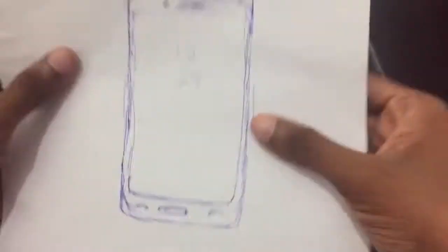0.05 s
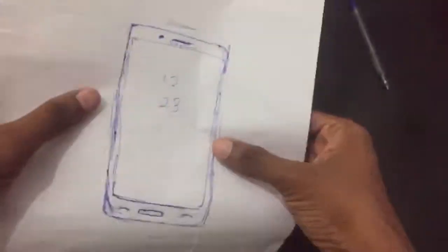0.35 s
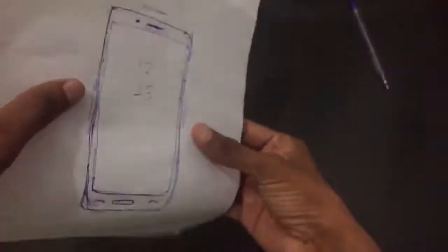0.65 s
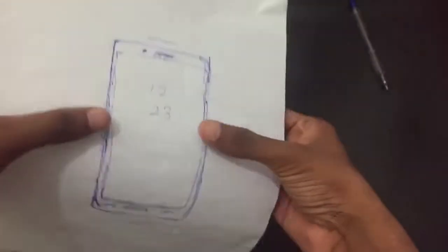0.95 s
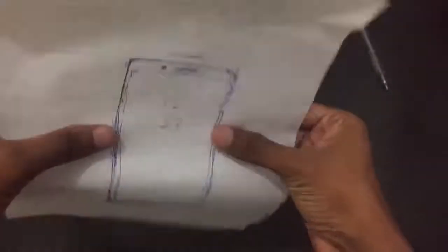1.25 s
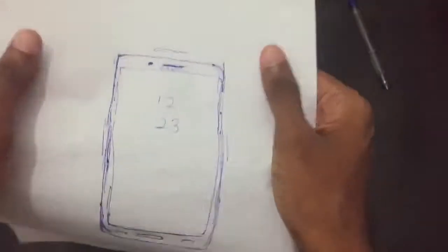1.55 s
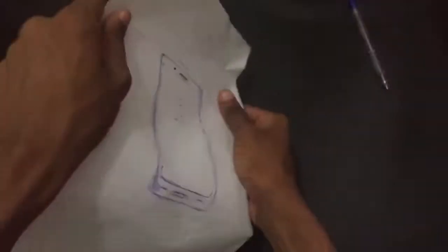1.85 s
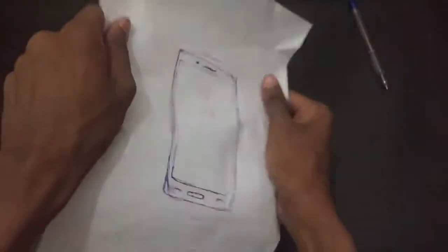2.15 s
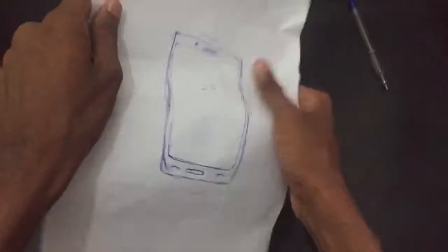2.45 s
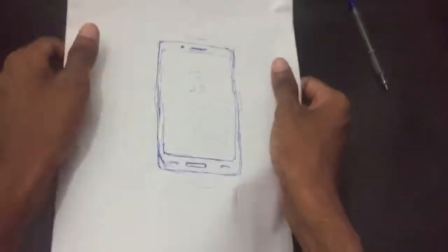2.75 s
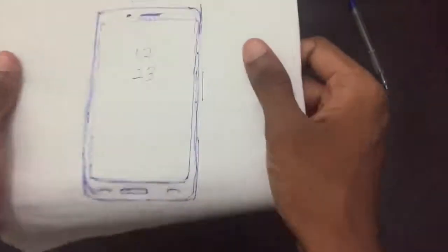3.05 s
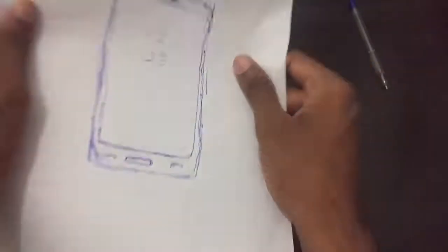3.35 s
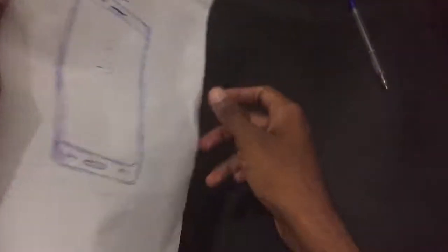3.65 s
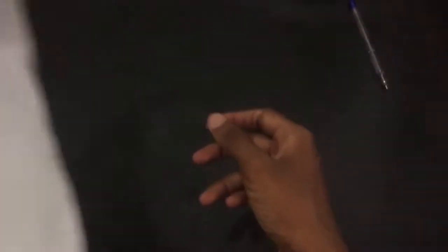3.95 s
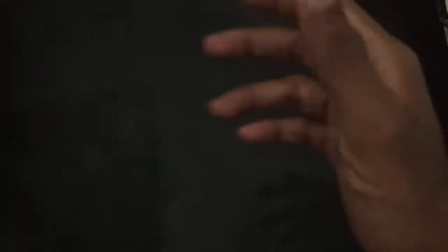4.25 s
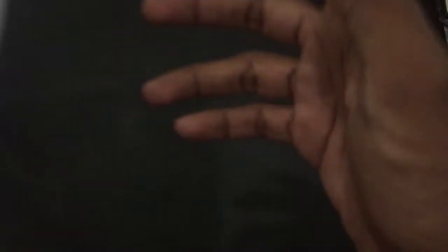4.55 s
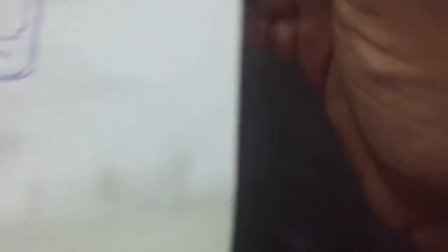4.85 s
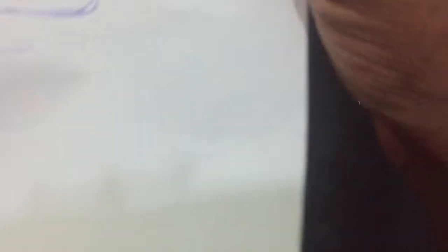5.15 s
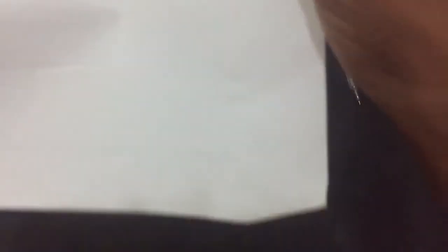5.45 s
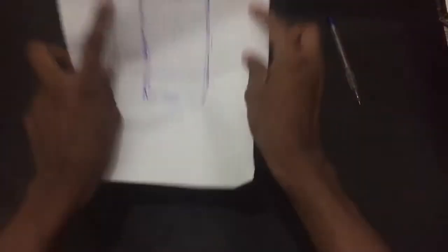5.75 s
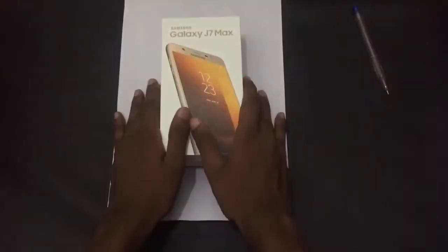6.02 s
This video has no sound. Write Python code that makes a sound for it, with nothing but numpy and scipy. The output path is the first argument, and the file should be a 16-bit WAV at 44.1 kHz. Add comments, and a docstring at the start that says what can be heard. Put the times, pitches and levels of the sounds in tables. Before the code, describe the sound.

Close by in a small, quiet room, hands wave and bend a sheet of paper, which crackles and flutters over the soft hiss of sliding fingers. The rustling thins out and fingers knock lightly on a hollow cardboard box. The sheet then scrapes and slaps onto a table, the box lands with a thump, and a faint, thin, high whine follows.

```python
"""Paper and a cardboard box

Two hands wave and bend a sheet of paper over a table in a small room. Creases snap over a fine
rustle and the hiss of sliding fingers. Fingers knock on a hollow cardboard box, the sheet scrapes
and slaps onto the table, the box lands with a thump, and a thin, high whine follows."""
import sys
import numpy as np
from scipy import signal
from scipy.fft import rfft, irfft
from scipy.io import wavfile

SR = 44100
rng = np.random.default_rng(int(sys.argv[2]) if len(sys.argv) > 2 else 0)


def put_to_file(sound):
    """Save the sound as 16-bit audio at rate SR, in the file named by the first command-line argument."""
    columns = np.atleast_2d(sound).T  # one column per channel
    safe = np.clip(columns, -1, 1)
    whole_steps = np.round(safe * 32767)
    wavfile.write(sys.argv[1], SR, whole_steps.astype(np.int16))


N = 276948
TIME = np.arange(N) / SR
LET_GO_S = 4.48  # the sheet is put aside here

# Each move of the hands bends the sheet: start_s, length_s, flutter_db, crackle_db
BENDS = [(0, 0.013, -62.5, -57), (.17, 0.056, -47.5, -44), (.29, 0.018, -58, -55), (.44, 0.13, -57.5, -67),
         (.53, 0.035, -51.5, -52), (.62, 0.046, -51, -50.5), (.78, 0.027, -49, -58),
         (.88, 0.085, -57.5, -58.5), (1.11, 0.21, -50, -47), (1.36, 0.039, -51.5, -42),
         (1.43, 0.19, -50, -48.5), (1.71, .17, -49.5, -46), (1.93, 0.034, -46, -34),
         (2.01, 0.016, -47, -43.5), (2.14, 0.18, -48, -40), (2.34, 0.073, -52, -46.5),
         (2.55, 0.073, -46.5, -47), (2.71, 0.05, -58.5, -51.5), (3.01, 0.037, -64, -60.5),
         (3.2, 0.15, -54.5, -54.5), (3.53, 0.022, -60, -43), (4.0, 0.13, -57.5, -68),
         (4.28, 0.078, -70, -58), (4.35, 0.03, -46.5, -57), (4.63, 0.029, -77.5, -62.5),
         (4.87, 0.067, -58.5, -72.5), (5.292, 0.21, -53.5, -59.5), (5.54, 0.17, -56.5, -48.5),
         (5.75, 0.092, -58, -50), (5.87, .1, -41, -44)]
# The curved sheet rings like a hollow: pitch_hz, width_hz, level_db
SHEET_HOLLOWS = [(165, 15, -11), (302, 45, -7), (476, 24, -9)]
# Fingers stroke along the paper: start_s, length_s, level_db
STROKES = [(0, .055, -56.5), (0.29, 0.049, -54.5), (0.401, 0.041, -59.5), (0.494, 0.097, -57),
           (0.938, 0.034, -60.5), (1.148, 0.19, -51.5), (1.417, 0.072, -47), (1.466, .13, -52.5),
           (1.666, 0.093, -52), (1.73, 0.25, -58), (1.94, .11, -62), (2.153, 0.16, -59), (2.4, 0.088, -52),
           (2.513, .15, -50), (2.722, 0.082, -51), (2.992, 0.08, -55), (3.071, 0.04, -57.5),
           (3.151, 0.054, -54.5), (3.191, 0.084, -58), (3.51, 0.13, -62)]
# The held sheet whispers, louder when it is near: time_s, level_db
WHISPER_LEVELS = [(0, -68.5), (1.1, -70), (1.3, -62), (2.9, -69.5), (3.4, -70.5), (4.2, -78.5), (4.3, -100)]
# Wide swings push puffs of air: start_s, length_s, level_db
AIR_PUFFS = [(2.19, .04, -55), (2.59, 0.03, -46.5), (4.06, 0.056, -56), (4.88, 0.037, -52),
             (5.29, 0.05, -38.5), (5.39, 0.29, -52), (5.92, 0.063, -33.5), (6.06, .2, -48)]
# The loudest snaps and slaps of the sheet: time_s, level_db, build_up_s, centre_hz, treble_db
SHEET_SNAPS = [(0.0185, -47, 0.0019, 1060, -10), (0.1738, -37.5, 0.00047, 1450, -3),
               (0.2, -36.5, 0.012, 1260, -1), (0.2403, -36.5, 0.00052, 1140, -3),
               (0.2691, -39, 0.0019, 1380, -31), (0.329, -36.5, .0034, 1400, -3),
               (0.492, -50.5, 0.0024, 1000, -16), (0.5598, -40, 0.0035, 1500, -21),
               (0.6076, -44, .0005, 1550, -8), (0.6221, -37.5, 0.00024, 1520, -13),
               (0.6594, -31.5, 0.0034, 1580, -5), (0.7232, -40.5, 0.0011, 1330, -36),
               (0.7974, -28.5, .0015, 1760, -2), (0.8196, -38.5, 0.0012, 1510, -11),
               (0.898, -42.5, 0.0035, 1420, -38), (1.0312, -46.5, 0.00087, 1800, -47),
               (1.1156, -30, 0.0001, 1610, 26.5), (1.124, -33.5, 0.0025, 1690, 4),
               (1.1582, -40.5, 0.0016, 1320, -18), (1.19, -25.5, 0.0023, 1620, 16.5),
               (1.2933, -33, 0.0057, 1320, -2), (1.312, -35, 0.0043, 1420, 3),
               (1.371, -33.5, 0.004, 1400, -4), (1.4355, -29, 0.00065, 1530, -20),
               (1.5359, -42.5, .001, 1580, 4), (1.725, -36, 0.015, 1470, -6),
               (1.7813, -34, 0.00027, 1480, -2), (1.7866, -32.5, 0.001, 2100, -8),
               (1.8624, -22, 0.0053, 1690, 1.5), (1.92, -37, 0.0048, 1410, -3),
               (1.9408, -32, .0016, 2020, 3), (1.955, -27, 0.0083, 2020, 10), (2, -45.5, .0008, 2200, 71),
               (2.018, -35, 0.0022, 1680, 3), (2.0381, -29.5, 0.0098, 1600, -3),
               (2.1069, -33, 0.011, 1180, -9), (2.1458, -36.5, 0.00028, 1670, 10.5),
               (2.1538, -36.5, 0.00094, 2000, 17), (2.159, -32, 0.0061, 1320, 0),
               (2.1753, -27, 0.0013, 1780, 8), (2.2022, -21, 0.0052, 1650, 2.5),
               (2.2119, -35, 0.0075, 1320, -2), (2.259, -24, 0.0049, 1890, 7.5),
               (2.2975, -29, .0035, 1860, -4), (2.3059, -25.5, 0.0046, 1480, -3),
               (2.357, -37.5, 0.0056, 1750, 1), (2.405, -31.5, 0.0072, 1520, -5),
               (2.5295, -34, 0.013, 2300, 20), (2.5612, -30.5, 0.0007, 1510, 2),
               (2.5819, -32, 0.0013, 1880, 11), (2.598, -26, 0.0069, 1700, 9),
               (2.641, -42, 0.00072, 1480, -30), (2.66, -41.5, 0.00077, 1370, -31),
               (2.7241, -42.5, 0.0062, 1180, -2), (2.7763, -39, 0.00064, 1980, 1),
               (3.011, -44.5, .0007, 2720, 14), (3.0723, -49.5, 0.0024, 1330, 5),
               (3.084, -47, 0.00043, 1880, 57), (3.2216, -44, 0.0013, 1740, 2),
               (3.2863, -36, 0.0041, 1750, -5), (3.3629, -36.5, .0003, 2120, 13),
               (3.378, -36.5, 0.00087, 1380, -4), (3.541, -32.5, 0.0033, 1260, -36),
               (4.36, -34, 0.0012, 1470, -59), (4.912, -49.5, 0.0019, 1080, -25.5),
               (5.2612, -51, 0.00047, 1590, 5), (5.2928, -39.5, 0.00031, 667, 13),
               (5.307, -51.5, .0006, 1200, -6), (5.331, -49.5, .001, 1280, -14),
               (5.583, -36, 0.0022, 1020, 16), (5.628, -29.5, 0.005, 1740, 12), (5.64, -35, 0.007, 1080, 5),
               (5.8581, -22.5, .0012, 1550, 2), (5.8697, -22.5, 0.00062, 1590, 17),
               (5.8762, -15, 0.002, 1190, -1), (5.882, -21.5, 0.0035, 1210, 18.5),
               (5.891, -27, .0045, 1200, 20), (5.9259, -30.5, 0.0013, 1000, 19),
               (5.931, -19, 0.0019, 1300, -7)]
# How long the room's echo takes to fade by 60 dB: pitch_hz, fade_s
ROOM_FADES = [(100, 0.27), (500, 0.79), (1500, 0.28), (4000, 0.4), (12000, 0.41)]
# A dry finger rubs on paper or card: start_s, length_s, level_db, pitch_hz
FINGER_RUBS = [(0.433, 0.08, -60.5, 990), (0.978, 0.037, -58, 1180), (2.926, .03, -56.5, 1870),
               (4.646, 0.027, -63.5, 1330), (4.78, 0.11, -63, 1322)]
# The box is touched, picked up and set down: time_s, level_db
BOX_KNOCKS = [(3.5405, -36), (3.9107, -49.5), (4.0144, -42), (4.056, -51), (4.087, -54), (4.1179, -40.5),
              (4.135, -46.5), (4.362, -43.5), (4.80, -54.5), (5.083, -60.5), (5.9282, -31), (5.94, -31),
              (5.958, -43)]
# The hollow box's own notes, each fading by 60 dB: pitch_hz, level_db, fade_s
BOX_NOTES = [(436, 2.5, 0.035), (577, -3, 0.038), (655, -1, 0.064), (800, -5, 0.02), (1166, 3, 0.02),
             (1380, -0.5, 0.026), (1780, -15, 0.012), (2250, -14.5, 0.031)]
# Blows on the table, where a longer contact sounds duller: time_s, level_db, contact_s
TABLE_BLOWS = [(5.292, -39.5, 0.0046), (5.58, -44, 0.0011), (5.921, -32, 0.0013), (5.9389, -20.5, 0.0031)]
# The notes of the table with the box on it, each fading by 60 dB: pitch_hz, level_db, fade_s
TABLE_NOTES = [(102.7, 4, 0.29), (83.3, -7, 0.57), (58.5, -19.5, 0.92), (165, -19, 0.23), (234, -11, 0.36),
               (276, -5.5, 0.31), (360, -10, 0.37)]
# The sheet and the box scrape over the table: start_s, length_s, level_db
TABLE_SCRAPES = [(5.478, 0.057, -49), (5.57, 0.11, -47.5), (5.67, 0.088, -54.5), (5.8, .06, -46),
                 (5.92, 0.013, -48)]
# Air hisses out as the sheet is slapped flat: start_s, length_s, level_db
SLAP_HISS = [(5.868, 0.016, -25.5)]
# The two tones of the whine: time_s, upper_hz, lower_hz, level_db
WHINE_TONES = [(5.95, 5000, 4850, -66), (5.98, 5050, 4970, -47), (6.04, 5070, 4680, -46.5),
               (6.08, 5020, 4620, -48), (6.13, 5010, 4730, -49), (6.155, 5080, 4220, -47.5),
               (6.19, 5040, 4490, -50.5), (6.28, 5160, 4960, -49.5)]
# The sound is a little dull at first, then very dull for a while: time_s, treble_lost_share
TREBLE_LOSS = [(3.44, .33), (3.46, .65), (4.2, .7), (4.26, 1), (5.472, 1), (5.485, 0)]
# The level dips briefly: time_s, half_width_s, depth_db
LEVEL_DIPS = [(4.24, 0.012, 25), (5.913, 0.0044, 26.5)]

# A "tone" table says how strong the low and high parts of a sound are, compared with each other.
# Crackling paper fibres: pitch_hz, gain_db
CRACKLE_TONE = [(150, -26.5), (500, -4), (800, 4), (1200, 4.5), (1800, 1), (2800, -4.5), (4200, -14.5),
                (6000, -24), (10000, -43), (16000, -55.5)]
# The whole sheet fluttering: pitch_hz, gain_db
FLUTTER_TONE = [(40, -21.5), (90, 3.5), (150, 1), (330, 0.5), (500, -3.5), (800, -16), (2000, -32),
                (6000, -75.5)]
# Rumbling air: pitch_hz, gain_db
RUMBLE_TONE = [(15, -14), (35, -0.5), (65, 11.5), (110, 1), (170, -20), (500, -49.5)]
# Fingertips sliding on paper: pitch_hz, gain_db
SLIDE_TONE = [(500, -20.5), (1500, 13), (4000, 8.5), (6500, 9.5), (10000, 2), (14000, 2), (16000, -10.5)]
# The faint hiss round the held sheet: pitch_hz, gain_db
WHISPER_TONE = [(500, -11), (1500, 0.5), (4000, -8), (6500, 4.5), (8700, 0), (9200, 5), (9700, -11.5),
                (14000, -6.5), (16000, -11)]
# The quiet room: pitch_hz, gain_db
ROOM_TONE = [(20, 2), (70, -3.5), (160, -0.5), (400, -4.5), (1400, -5.5), (3000, -13.5), (5300, -17),
             (6500, -46), (16000, -54.5)]
# A snapping crease: pitch_hz, gain_db
SNAP_TONE = [(40, -23.5), (130, -4), (200, -10.5), (330, -2), (430, -5), (720, -10), (1050, 1), (1500, 1),
             (2400, -6), (3700, -12.5), (5200, -20.5), (10000, -35), (16000, -51)]
# Rattling cardboard: pitch_hz, gain_db
RATTLE_TONE = [(80, -10), (300, -3.5), (700, 5), (1200, 5.5), (2200, -3.5), (5000, -29.5),
               (15000, -50.5)]
# Paper scraping on the table: pitch_hz, gain_db
SCRAPE_TONE = [(400, 0.5), (1500, 11), (4000, 4.5), (6000, 6), (7800, -3), (9200, -1), (11000, -5.5),
               (15000, -3), (16000, -7)]
# The rasp round the whine: pitch_hz, gain_db
RASP_TONE = [(2500, -56), (3900, -44), (4400, -9), (4900, 4), (5150, 5), (5350, -45), (7800, -37),
             (9300, -10), (10200, -22), (10600, -46), (13500, -46), (15200, -35), (16000, -43)]


def gain_of(db):
    """Turns decibels into a number to multiply by."""
    return 10 ** (np.asarray(db) / 20)


def evened(x):
    """Scales a sound so that its average power is 1."""
    return x / np.sqrt(np.mean(x ** 2) + 1e-20)


def look_up(table, hz):
    """A table's value at any pitch, sliding evenly through the octaves between its rows."""
    pitches, values = np.transpose(table)
    return np.interp(np.log(hz + 1), np.log(pitches + 1), values)


def curve(rows, column=1):
    """Joins one column of a time table with straight lines, giving a value for every sample."""
    rows = np.asarray(rows)
    return np.interp(TIME, rows[:, 0], rows[:, column])


def add(mix, start_s, sound):
    """Adds a sound to the mix at the given time."""
    part = mix[max(round(start_s * SR), 0):][:len(sound)]
    part += sound[:len(part)]


def ring(db_at, size=2048):
    """The short ring of one click whose strength at each pitch is db_at(hz)."""
    hz = abs(np.fft.fftfreq(size, 1 / SR))
    log_gain = np.log(gain_of(np.maximum(db_at(hz), -100)))
    spectrum = np.exp(np.conj(signal.hilbert(log_gain)))  # puts all the ringing after the click
    return np.fft.ifft(spectrum).real


def shaped(x, tone):
    """Gives a sound the lows and highs of a tone table, at power 1."""
    response = ring(lambda hz: look_up(tone, hz), size=8192)
    return evened(signal.oaconvolve(x, response)[:len(x)])


def noise(tone, size=N):
    """Steady noise shaped by a tone table."""
    return shaped(rng.standard_normal(size), tone)


def wander(rate_hz):
    """A smooth random wobble, mostly slower than rate_hz."""
    hz = np.fft.rfftfreq(N, 1 / SR)
    return evened(irfft(rfft(rng.standard_normal(N)) / (1 + (hz / rate_hz) ** 4), N))


def grains(per_s, spread_db):
    """Random clicks, most of similar size and a few that differ more."""
    sizes = gain_of(spread_db * np.minimum(rng.exponential(1, N), 4)) * rng.choice([-1, 1], N)
    return evened(sizes * (rng.random(N) < per_s / SR))


def swells(rows, rise_s, fade_db_per_s, column=2):
    """A loudness curve in which each row rises, holds and dies away; overlaps add in power."""
    power = np.zeros(N)
    for row in rows:
        t = TIME - row[0]
        level_db = row[column] - fade_db_per_s * np.maximum(t - row[1], 0)
        power += (np.clip(t / rise_s, 0, 1) * gain_of(level_db)) ** 2
    return np.sqrt(power)


def resonate(x, hz, width_hz):
    """Makes a sound ring round a pitch that may move; a narrower width rings longer."""
    turn = np.exp(2j * np.pi * np.cumsum(hz) / SR)
    decay = np.exp(-np.pi * width_hz / SR)
    return 2 * (turn * signal.lfilter([1 - decay], [1, -decay], x / turn)).real


def rustle(rise_s=0.0077, fade_db_per_s=192, clump_db=3, drift=0.1):
    """With each bend, fibres crackle, small creases snap, and the sheet flutters and fans the air."""
    held = np.clip(LET_GO_S - TIME, 0, 1) ** 0.5  # a held sheet is never quite still
    bending = np.hypot(swells(BENDS, rise_s, fade_db_per_s, column=3), held * gain_of(-69))
    flapping = np.hypot(swells(BENDS, rise_s, fade_db_per_s), held * gain_of(-68))
    fibres = grains(per_s=1100, spread_db=-0.5) * gain_of(clump_db * wander(rate_hz=38))
    crackle = gain_of(-1) * shaped(fibres, CRACKLE_TONE)
    small_snaps = gain_of(-6) * shaped(grains(per_s=60, spread_db=1), SNAP_TONE)
    buckling = grains(per_s=800, spread_db=3.5)
    pitch_drift = np.exp(drift * wander(rate_hz=4))  # the hollow notes move as the sheet curves
    hollow = sum(gain_of(db) * evened(resonate(buckling, hz * pitch_drift, width_hz))
                 for hz, width_hz, db in SHEET_HOLLOWS)
    flutter = gain_of(-1) * shaped(buckling, FLUTTER_TONE) + hollow
    air = gain_of(-8) * noise(RUMBLE_TONE)
    return (crackle + small_snaps) * bending + (flutter + air) * flapping


def sliding(uneven_db=2.5, taper=0.55):
    """Fingertips drag over the paper's grain and hiss with each stroke, over the sheet's whisper."""
    strokes = np.zeros(N)
    for start_s, length_s, db in STROKES:
        add(strokes, start_s, gain_of(db) * signal.windows.tukey(int(length_s * SR), taper))
    hiss = noise(SLIDE_TONE) * gain_of(uneven_db * wander(rate_hz=430))
    whisper = noise(WHISPER_TONE) * gain_of(curve(WHISPER_LEVELS))
    return hiss * strokes + whisper


def room_air(rumble_db=-80, quiet_db=-71):
    """The room murmurs, and the swinging hands and sheet push low puffs of air through it."""
    puffs = gain_of(-2) * swells(AIR_PUFFS, rise_s=0.0067, fade_db_per_s=148)
    rumble = noise(RUMBLE_TONE) * (puffs + gain_of(rumble_db))
    return rumble + gain_of(quiet_db) * noise(ROOM_TONE)


def room_echo(x, first_s=0.004, echoes_per_s=3000):
    """Sound bounces round the room, and each pitch dies away at its own speed."""
    t = np.arange(SR // 2) / SR
    echoes = rng.standard_normal(len(t)) * (rng.random(len(t)) < echoes_per_s / SR) * (t > first_s)
    hz, delay_s, bands = signal.stft(echoes, SR, nperseg=256)
    fade = gain_of(-60 * delay_s / look_up(ROOM_FADES, hz)[:, None])
    tail = signal.istft(bands * fade, SR, nperseg=256)[1]
    return signal.fftconvolve(x, tail / np.linalg.norm(tail))[:N]


def patch_ring(centre_hz, treble_db, on_table, usual_hz=1600, bass_hz=600, treble_hz=4500):
    """A snapped patch of paper rings briefly; a larger patch rings lower and with more bass."""
    shift = usual_hz / centre_hz
    bass_db = -3 + 12.5 * np.log2(shift) + 4 * on_table  # fuller against the table or box
    # every bend of the sheet has its own hollow notes
    note_hz = np.geomspace(150, 12000, 80)
    notes = np.c_[note_hz, 5 * rng.standard_normal(len(note_hz)) * note_hz / (note_hz + 350)]

    def db_at(hz):
        """The snap's tone, with the pitch shift fading out towards the treble."""
        shifted_hz = hz * shift ** (1 / (1 + (hz / treble_hz) ** 2))
        bass = bass_db / (1 + (hz / bass_hz) ** 4)
        treble = treble_db * (1 - 1 / (1 + (hz / treble_hz) ** 4))
        return look_up(SNAP_TONE, shifted_hz) + look_up(notes, hz) + bass + treble
    return ring(db_at)


def snaps(slips_per_s=9000, burst_share=0.59, settle_s=0.059, size=4096):
    """A crease gives way in a burst of tiny slips round one main click."""
    out, lead = np.zeros(N), size // 4
    t = (np.arange(size) - lead) / SR
    for time_s, db, build_s, centre_hz, treble_db in SHEET_SNAPS:
        fall_s = 0.0022 + build_s  # a snap that builds slowly also dies slowly
        slips = rng.choice([-1, 1], size) * (rng.random(size) < slips_per_s / SR)
        swell = np.exp(-np.where(t < 0, (t / build_s) ** 2, t / fall_s))
        settling = gain_of(-24) * np.exp(-abs(t) / settle_s) * (t > 0)
        patch = patch_ring(centre_hz, treble_db, on_table=time_s > LET_GO_S)
        burst = evened(signal.fftconvolve(slips * (swell + settling), patch)[:size])
        click = evened(signal.fftconvolve(signal.unit_impulse(size, lead), patch)[:size])
        snap = np.sqrt(burst_share) * burst + np.sqrt(1 - burst_share) * click
        snap *= np.sqrt(0.01 * SR) / np.linalg.norm(snap)  # as much energy as 10 ms at power 1
        add(out, time_s - lead / SR, gain_of(db) * snap)
    return out


def rubbing(slips_per_s=700, width_hz=400, rise_s=0.0204, fade_db_per_s=300, size=16384):
    """A dry fingertip sticks and slips quickly, making the paper or card ring softly at one pitch."""
    out, t = np.zeros(N), np.arange(size) / SR
    for start_s, length_s, db, hz in FINGER_RUBS:
        slips = rng.exponential(1, size) * (rng.random(size) < slips_per_s / SR)
        pitch = np.full(size, hz)
        rub = evened(resonate(resonate(slips, pitch, width_hz), pitch, width_hz))
        loudness = np.minimum(t / rise_s, 1) * gain_of(db - fade_db_per_s * np.maximum(t - length_s, 0))
        add(out, start_s, rub * loudness)
    return out


def knocks(tick_db=-7, tick_s=0.0009, uneven_db=2, rise_s=0.0003):
    """Each touch ticks on the box and rings its sides, a little differently at each spot."""
    out, t = np.zeros(N), np.arange(SR // 4) / SR
    for time_s, db in BOX_KNOCKS:
        sides = np.zeros(len(t))
        for hz, note_db, fade_s in BOX_NOTES:
            loudness = gain_of(note_db + uneven_db * rng.standard_normal() - 60 * t / fade_s)
            sides += loudness * np.sin(2 * np.pi * (hz * t + rng.random()))
        tick = gain_of(tick_db) * noise(CRACKLE_TONE, len(t)) * np.exp(-t / tick_s)
        add(out, time_s, gain_of(db) * (sides + tick) * (1 - np.exp(-t / rise_s)))
    return out


def thumps(rattle_db=-11, rattle_s=0.051):
    """Each blow sets the table's low notes ringing, and the cardboard rattles for a moment."""
    out, t = np.zeros(N), np.arange(SR) / SR
    table = sum(gain_of(db - 60 * t / fade_s) * np.cos(2 * np.pi * hz * t)
                for hz, db, fade_s in TABLE_NOTES)
    for time_s, db, contact_s in TABLE_BLOWS:
        push = np.sin(np.pi * np.minimum(t / contact_s, 1))
        rattle = gain_of(rattle_db) * noise(RATTLE_TONE, SR) * np.exp(-t / rattle_s)
        thud = signal.fftconvolve(table, push / push.sum())[:SR]
        add(out, time_s, gain_of(db) * (thud + rattle))
    return out


def scraping(uneven_db=1.5):
    """A bright, gritty hiss as paper and box drag on the table and the slap squeezes air out."""
    scrapes = swells(TABLE_SCRAPES, rise_s=0.01186, fade_db_per_s=150)
    slap = swells(SLAP_HISS, rise_s=0.0029, fade_db_per_s=905)
    grit = grains(per_s=7000, spread_db=2) * gain_of(uneven_db * wander(rate_hz=200))
    return (scrapes + slap) * shaped(grit, SCRAPE_TONE)


def whine(lower_db=-7, flicker_db=3, harmonics_db=(0, -17, -22), rasp_db=-8):
    """A high tone and a weaker, rougher one below it, both with faint overtones, in a thin rasp."""
    out = gain_of(rasp_db) * noise(RASP_TONE)
    upper_hz = curve(WHINE_TONES) + 35 * wander(rate_hz=300)
    lower_hz = curve(WHINE_TONES, column=2) + 140 * wander(rate_hz=470)
    for hz, db in [(upper_hz, 0), (lower_hz, lower_db)]:
        angle = 2 * np.pi * np.cumsum(hz) / SR
        tone = sum(gain_of(part_db) * np.sin(k * angle) for k, part_db in enumerate(harmonics_db, 1))
        out += tone * gain_of(db + flicker_db * wander(rate_hz=54))
    started = TIME > WHINE_TONES[0][0]
    return out * gain_of(curve(WHINE_TONES, column=3)) * started


def scene(echo_db=-18):
    """Paper and box close by with a little echo, plus the whine and the room's air, in mono."""
    near = rustle() + sliding() + snaps() + rubbing() + knocks() + thumps() + scraping()
    return (near + gain_of(echo_db) * room_echo(near) + whine() + room_air())[None]


def record(dry, dull_hz=5700, peak_limit=0.4, top_hz=16000):
    """Dulls the sound for a while, dips its level twice, rounds its peaks and cuts the very top."""
    dull = signal.sosfiltfilt(signal.butter(8, dull_hz, fs=SR, output="sos"), dry)
    dulled = dry + curve(TREBLE_LOSS) * (dull - dry)
    dip_db = sum(depth_db * np.exp(-((TIME - time_s) / half_width_s) ** 2)
                 for time_s, half_width_s, depth_db in LEVEL_DIPS)
    dipped = dulled * gain_of(-dip_db)
    rounded = dipped / (1 + (dipped / peak_limit) ** 4) ** 0.25
    top_cut = signal.firwin(511, top_hz, window=("kaiser", 9), fs=SR)
    return signal.oaconvolve(rounded, top_cut[None], "same")


dry = scene()
out = record(dry)
put_to_file(out)
```